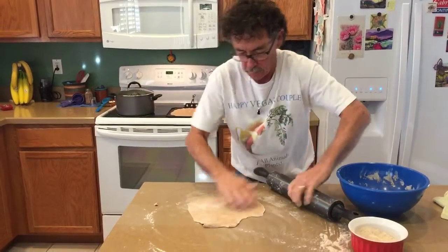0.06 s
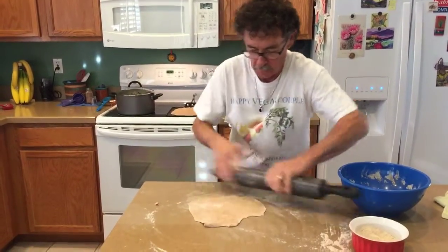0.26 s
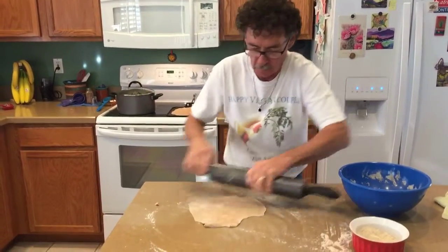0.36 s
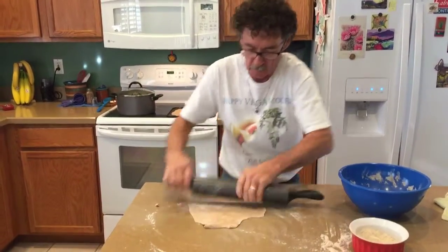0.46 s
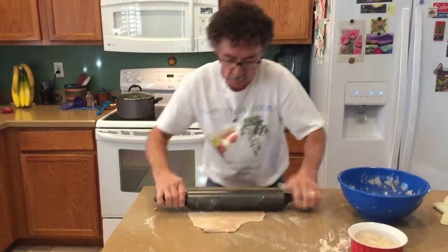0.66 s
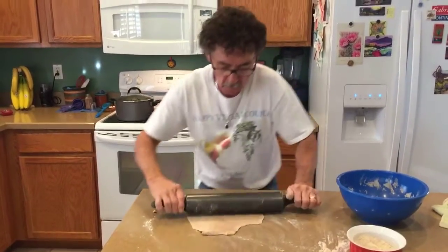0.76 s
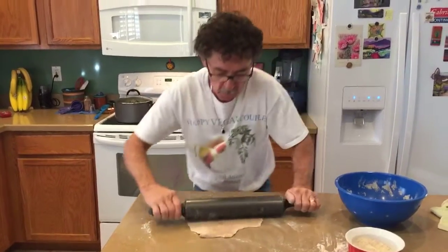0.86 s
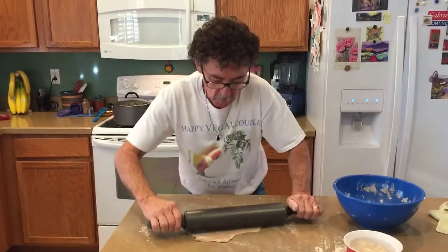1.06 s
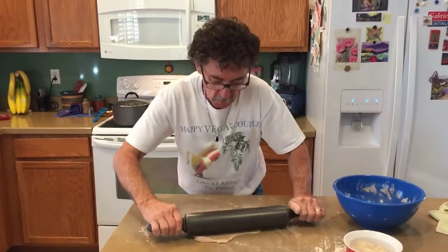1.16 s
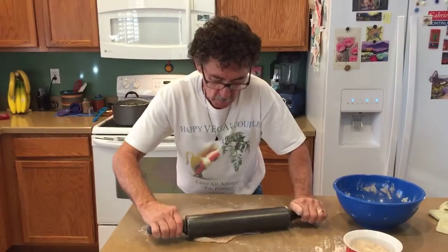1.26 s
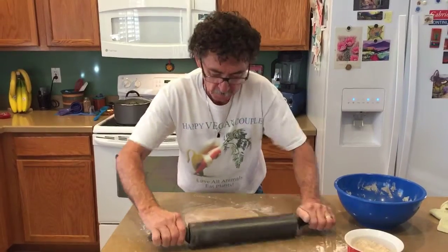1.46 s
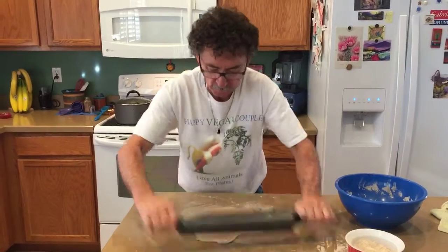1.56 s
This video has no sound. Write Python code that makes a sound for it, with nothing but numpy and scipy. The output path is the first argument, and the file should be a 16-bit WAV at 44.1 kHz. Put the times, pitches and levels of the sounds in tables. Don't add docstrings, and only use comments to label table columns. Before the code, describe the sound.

A heavy rolling pin in a reverberant kitchen, picked up by one microphone. A hand slaps dough at 0.01 seconds, faintly ringing a metal bowl. At 0.22 the pin knocks loudly, bright and ringing, with board thumps. It chatters onto the counter at 0.49 amid palm hiss; the handle clicks at 0.64. Quiet axle rubbing and singing fade by 1.2, then floury crunching from 1.38, ticks at 1.48 and 1.57. Faint fridge hum.

```python
import sys
import numpy as np
from scipy import signal
from scipy.fft import rfft, irfft
from scipy.io import wavfile
from scipy.ndimage import map_coordinates

SR = 44100
rng = np.random.default_rng(int(sys.argv[2]) if len(sys.argv) > 2 else 0)


def dump(signal):
    limited = np.clip(np.atleast_2d(signal).T, -1, 1)
    pcm = np.round(limited * 32767).astype(np.int16)
    wavfile.write(sys.argv[1], SR, pcm)


def amplitude_ratio(level_db):
    exponent = np.asarray(level_db, float) / 20
    return 10 ** exponent


N = 70560

# frequency in Hz, t60 in seconds.
KITCHEN_T60 = [(100, 0.87), (400, 0.58), (1500, 0.9), (5000, 0.54), (12000, 0.33)]
WET_DB = {"slap": 0.5, "knock": -6, "board": -10.5, "landing": -8, "click": -10.5, "tick": -10}

# frequency in Hz, level in dB.
AIR_COLOUR = [(15, -54.5), (50, -2), (120, -0.5), (300, -13.5), (1000, -13), (4000, -19), (12900, -28),
              (16000, -26)]
# time in seconds, level in dB.
HUM_LEVEL = [(0, -65.5), (1.33, -67.5), (1.45, -79), (1.6, -80.5)]

# time in seconds, level in dB.
SWAY_LEVEL = [(-.05, -88), (.12, -65), (.2, -77), (.55, -78), (.75, -81), (1.6, -75.5)]
# frequency in Hz, level in dB.
SWAY_COLOUR = [(25, -32), (45, 4.5), (70, -3.5), (110, -31.5)]

# start in seconds, level in dB, t60 in seconds.
SLAPS = [
    (.0078, -30, 0.033),
    (.153, -65, .02),
    (.208, -50, 0.043),
]
# frequency in Hz, level in dB.
SLAP_COLOUR = [(150, -45.5), (300, 2.5), (500, -17.5), (700, -4), (1500, -6.5), (3000, -8), (8000, -10),
               (15500, -19.5)]
# centre in Hz, width in Hz, level in dB.
SLAP_PEAKS = [(1090, 200, -4), (1600, 260, 7), (3006, 110, 14)]
# frequency in Hz, level in dB, t60 in seconds.
BOWL_MODES = [(690.7, -55, 0.42), (1090, -52.5, 0.17), (1317, -53.5, 0.49), (1560, -53.5, 0.96),
              (1630, -61.5, 0.666), (1610, -53, 0.21), (2426, -64, 0.9), (3190, -73, 0.46),
              (4020, -53, 0.28), (4770, -63.5, .4)]

# start in seconds, level in dB, t60 in seconds.
KNOCKS = [
    (.2190, -19, 0.11),
    (.2258, -19, 0.035),
    (.2292, -34, 0.017),
]
# frequency in Hz, level in dB.
KNOCK_COLOUR = [(150, -32), (300, -11), (700, -2.5), (1700, -9.5), (3000, -9.5), (3700, -3.5),
                (5500, -10.5), (15500, -30)]
# frequency in Hz, level in dB, t60 in seconds.
PIN_MODES = [(1344, -7, 0.3), (2600, -13, 0.22), (3256, -13.5, 0.27), (3630, 4, 0.22), (3740, 1, 0.059),
             (4880, -5, 0.31), (5330, -4, .1), (5690, -6, 0.45), (5700, -8.5, 0.2), (6460, -11, 0.17),
             (9400, -25, 0.17)]
PAIR_HZ = [1896, 1900, 2522.5, 2526.5]
PAIR_DB = [-34.5, -33]
PAIR_T60_S = [.55, .6]
# start in seconds, level in dB.
GRIP_SHIFT = [
    (.362, 0),
]
# frequency in Hz, level in dB, t60 in seconds.
GRIP_MODES = [(1898, -37, .22), (2525, -42, .35)]
# start in seconds, level in dB.
THUMPS = [
    (.2192, -27.5),
    (.2245, -27),
    (.2462, -20),
    (.2525, -27),
    (.271, -27),
]
# frequency in Hz, level in dB, t60 in seconds.
BOARD_MODES = [(306, -8, 0.035), (532.6, -7.5, 0.1), (644, -5.5, 0.065), (678, 3.5, 0.059),
               (704, -10, 0.066), (870, 8, 0.01), (1392, -17.5, 0.043)]

# time in seconds, level in dB.
PALM_LEVEL = [(.40, -80), (.47, -51), (.52, -57), (.57, -51.5), (.63, -54.5), (.69, -69), (.76, -100)]
# frequency in Hz, level in dB.
PALM_COLOUR = [(1200, -1), (3000, -1), (6000, -2), (9000, -5), (15000, -4)]
# centre in Hz, width in Hz, level in dB.
PALM_PEAKS = [(7000, 250, 4.5), (9700, 350, 4), (12650, 450, 4)]

# start in seconds, level in dB.
LANDINGS = [(.4873, -24.5), (.4885, -15.5), (.4928, -32.5), (.4953, -19), (.5036, -21), (.512, -24.5),
            (.524, -29.5), (.548, -31.5), (.567, -39), (.577, -35), (.592, -56), (.603, -32)]
# frequency in Hz, level in dB, t60 in seconds.
COUNTER_MODES = [(232, -12.5, 0.074), (405.5, -22, 0.072), (484.5, -15, 0.063), (544, -7.5, 0.1),
                 (585, -5.5, 0.037), (708, 5.5, 0.015), (842, -4.5, 0.014), (990, -19, 0.015)]
# frequency in Hz, level in dB, t60 in seconds.
THUD_MODES = [(49.4, -40, 0.49), (85, -43.5, 0.43), (116.4, -39, 0.41), (165.3, -40.5, 0.4)]
# start in seconds, level in dB, t60 in seconds.
LAND_CRACKS = [
    (.487, -30.5, 0.078),
    (.509, -42.5, 0.085),
]
# frequency in Hz, level in dB.
LAND_COLOUR = [(800, 0), (1500, 11.5), (3500, 0), (5500, -7), (7000, -15), (15000, -26)]

# start in seconds, level in dB, t60 in seconds.
CRUMBS = [
    (.603, -65, 0.0083),
    (1.382, -63, .03),
    (1.417, -76, 0.018),
    (1.449, -54, 0.049),
]
# frequency in Hz, level in dB.
CRUMB_COLOUR = [(1200, -32), (2000, -3), (4000, 3.5), (6000, 3), (9000, -5.5), (15000, -12)]

# start in seconds, level in dB.
CLICKS = [
    (.6440, -28.5),
    (.6477, -36.5),
]
# frequency in Hz, level in dB, t60 in seconds.
PEG_MODES = [(920, -5, 0.0044), (1500, 6.5, 0.0053), (2250, 5, 0.0056), (2930, 5.5, 0.0091),
             (3670, 4, 0.0095), (4030, 8, 0.0054), (7060, -13, 0.0051), (9600, -13, 0.0055),
             (13500, -15, .004)]

# time in seconds, level in dB.
ROLL_LEVEL = [(.645, -46.5), (.78, -59), (.87, -63), (.95, -63.5), (1.05, -67.5), (1.13, -71.5), (1.2, -78),
              (1.3, -90)]
# centre in Hz, width in Hz, level in dB.
AXLE_PEAKS = [(587, 84, -3), (914, 110, -9), (1382, 240, 0.5), (1760, 170, -0.5), (2255, 420, -12.5),
              (2540, 290, -12), (2770, 55, -5)]
# time in seconds, level in dB.
CREAK_LEVEL = [(.74, -99), (.79, -55), (.84, -82), (1.29, -96), (1.335, -70.5), (1.38, -89)]
# centre in Hz, width in Hz, level in dB.
CREAK_PEAKS = [(1336, 110, 0.0034)]
# time in seconds, level in dB.
SING_LEVEL = [(.92, -85), (.96, -65), (1.03, -63), (1.07, -70), (1.13, -68.5), (1.2, -82), (1.26, -93)]
# frequency in Hz, level in dB.
RUB_COLOUR = [(100, -45), (220, 1.5), (5000, -10.0), (8000, -14.5)]

# time in seconds, level in dB.
SQUEAK_LEVEL = [(.76, -100), (.775, -66.5), (.795, -70), (.81, -100)]
# centre in Hz, width in Hz, level in dB.
SQUEAK_PEAKS = [(9630, 390, -5), (11700, 410, -12), (12700, 300, -27)]
# frequency in Hz, level in dB.
SQUEAK_COLOUR = [(6000, -21), (9000, 0)]

# time in seconds, level in dB.
BARE_LEVEL = [(1.34, -85), (1.38, -66), (1.425, -56), (1.45, -60), (1.485, -58.5), (1.52, -66.5),
              (1.545, -83), (1.6, -82)]
# centre in Hz, width in Hz, level in dB.
TOP_PEAKS = [(244, 26.5, 4), (493, 150, -2), (630, 98, -11.5), (934, 74, -8), (1150, 78, -8.5),
             (1270, 59, -17), (3260, 590, -16), (4100, 200, -14)]
# frequency in Hz, level in dB.
GRIT_COLOUR = [(1500, 14), (3500, -7), (7000, 0), (15000, -6)]

# start in seconds, level in dB.
TICKS = [
    (1.4818, -47),
    (1.491, -66),
    (1.5668, -47),
    (1.577, -62),
]
# frequency in Hz, level in dB, t60 in seconds.
HANDLE_MODES = [(785, 8.5, 0.022), (920, -5, 0.043), (1270, -6.5, 0.035), (1500, -0.5, 0.018),
                (1680, -8, 0.035)]

T = np.arange(N) / SR


def unit(x):
    return x / np.sqrt(np.mean(x ** 2) + 1e-20)


def along(points, hz):
    f, v = np.transpose(points)
    return np.interp(np.log(hz + 1), np.log(f + 1), v)


def level(rows):
    s, db = np.transpose(rows)
    return amplitude_ratio(np.interp(T, s, db, left=-np.inf))


def wobble(knots_per_s):
    knots = rng.standard_normal(int(N * knots_per_s / SR) + 4)
    return map_coordinates(knots, [T * knots_per_s])


def noise(colour, peaks=(), base=1):
    f = np.fft.rfftfreq(N, 1 / SR)
    gain = base
    for centre, width, db in peaks:
        bend = (width * f) ** 2
        gain = gain + amplitude_ratio(db) * bend / ((centre ** 2 - f ** 2) ** 2 + bend)
    spectrum = rfft(rng.standard_normal(N)) * amplitude_ratio(along(colour, f))
    return unit(irfft(spectrum * gain, N))


def bursts(rows, sound, rise_s=0.00047):
    gain = 0
    for s, db, t60 in rows:
        decay = amplitude_ratio(db - 60 * np.clip(T - s, 0, 2) / t60)
        gain = gain + decay * np.clip((T - s) / rise_s, 0, 1)
    return sound * gain


def rung(rows, modes, vary_db=2, rise_s=0.0016, shaky=False):
    out = 0
    for s, db in rows:
        u = np.clip(T - s, 0, 2)
        luck = rng.standard_normal(len(modes))
        for (hz, mode_db, t60), k in zip(modes, luck):
            turn_rad, sway_db = 0, 0
            if shaky:
                turn_rad, sway_db = 1.6 * wobble(70), 3 * wobble(70)
            decay = amplitude_ratio(db + mode_db + vary_db * k + sway_db - 60 * u / t60)
            out = out + decay * (1 - np.exp(-u / rise_s)) * np.sin(2 * np.pi * hz * u + turn_rad)
    return out


def kitchen(x, wet_db):
    hz, t, z = signal.stft(rng.standard_normal(SR), SR, nperseg=256)
    decay = amplitude_ratio(-60 * t / along(KITCHEN_T60, hz)[:, None])
    tail = signal.istft(z * decay, SR, nperseg=256)[1]
    late = np.pad(x, (130, 0))
    return x + amplitude_ratio(wet_db) * signal.fftconvolve(late, tail / np.linalg.norm(tail))[:N]


def room_tone():
    hum_hz = 119.5
    sway_db, turn_rad = 1.7 * wobble(8), 0.33 * wobble(5)
    hum = level(HUM_LEVEL) * amplitude_ratio(sway_db) * np.sin(2 * np.pi * hum_hz * T + turn_rad)
    return hum + amplitude_ratio(-70) * noise(AIR_COLOUR)


def counter_sway():
    return level(SWAY_LEVEL) * noise([(6.7, -120)] + SWAY_COLOUR + [(200, -120)])


def slap():
    smack = bursts(SLAPS, noise(SLAP_COLOUR, SLAP_PEAKS))
    bowl = rung([(SLAPS[0][0], 0)], BOWL_MODES, shaky=True)
    return kitchen(smack + bowl, WET_DB["slap"])


def knock():
    start_s = KNOCKS[0][0]
    clatter = bursts(KNOCKS, noise(KNOCK_COLOUR), rise_s=0.000079)
    pairs = []
    for k, hz in enumerate(PAIR_HZ):
        weaker_db = -0.7 * (k % 2)
        pairs.append((hz, PAIR_DB[k // 2] + weaker_db, PAIR_T60_S[k // 2]))
    ring = rung([(start_s, -30)], PIN_MODES, shaky=True)
    ring = ring + rung([(start_s, 0)], pairs, vary_db=0)
    ring = ring + rung(GRIP_SHIFT, GRIP_MODES, vary_db=0, rise_s=0.028)
    board = kitchen(rung(THUMPS, BOARD_MODES), WET_DB["board"])
    return kitchen(clatter, WET_DB["knock"]) + board + kitchen(ring, wet_db=-18)


def palm_slide():
    return level(PALM_LEVEL) * amplitude_ratio(1.18 * wobble(40.3)) * noise(PALM_COLOUR, PALM_PEAKS)


def landing():
    thud = rung([(LANDINGS[0][0], 0)], THUD_MODES, rise_s=0.018)
    top = rung(LANDINGS, COUNTER_MODES, rise_s=0.0011)
    cracks = bursts(LAND_CRACKS, noise(LAND_COLOUR))
    return thud + kitchen(top + cracks, WET_DB["landing"])


def crumbs():
    return kitchen(bursts(CRUMBS, noise(CRUMB_COLOUR)), WET_DB["tick"])


def handle_clicks():
    return kitchen(rung(CLICKS, PEG_MODES, rise_s=0.00025), WET_DB["click"])


def bumps():
    return amplitude_ratio(2.5 * wobble(60))


def axle():
    rub = level(ROLL_LEVEL) * bumps() * noise(RUB_COLOUR, AXLE_PEAKS, base=0.039)
    creak = level(CREAK_LEVEL) * noise(RUB_COLOUR, CREAK_PEAKS, base=0.019)
    sing_hz = 1718
    sway_db, turn_rad = 2.5 * wobble(50), 1.4 * wobble(60)
    sing = level(SING_LEVEL) * amplitude_ratio(sway_db) * np.sin(2 * np.pi * sing_hz * T + turn_rad)
    return rub + creak + sing


def squeak():
    return level(SQUEAK_LEVEL) * noise(SQUEAK_COLOUR, SQUEAK_PEAKS, base=0.039)


def bare_top():
    rumble = bumps() * noise(RUB_COLOUR, TOP_PEAKS, base=0.047)
    grit = amplitude_ratio(-11.5 + 3.2 * wobble(110)) * noise(GRIT_COLOUR)
    return level(BARE_LEVEL) * (rumble + grit)


def handle_ticks():
    return kitchen(rung(TICKS, HANDLE_MODES, rise_s=0.00083), WET_DB["tick"])


def scene():
    hand = counter_sway() + slap() + palm_slide() + squeak()
    pin = knock() + landing() + handle_clicks() + handle_ticks()
    rolling = axle() + bare_top() + crumbs()
    return (room_tone() + hand + pin + rolling)[None]


def roll_off(x):
    return signal.sosfilt(signal.butter(12, 16460, fs=SR, output="sos"), x)


def record(dry):
    low_hz, top_hz = 40, 15250
    f = np.fft.rfftfreq(2 * N, 1 / SR)
    band = f ** 2 / (f ** 2 + low_hz ** 2) / (1 + (f / top_hz) ** 60)
    mix = irfft(rfft(dry, 2 * N) * band)[:, :N]
    return roll_off(mix)


dry = scene()
out = record(dry)
dump(out)
```